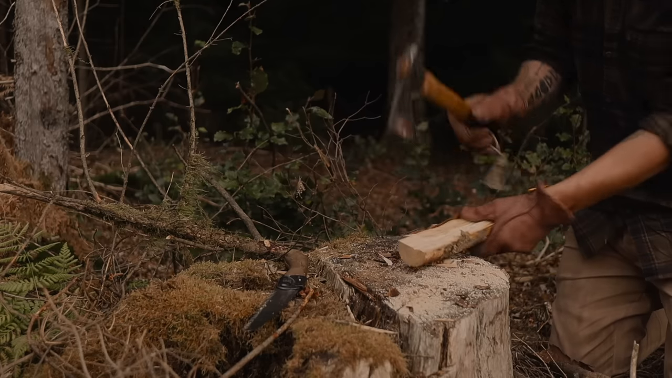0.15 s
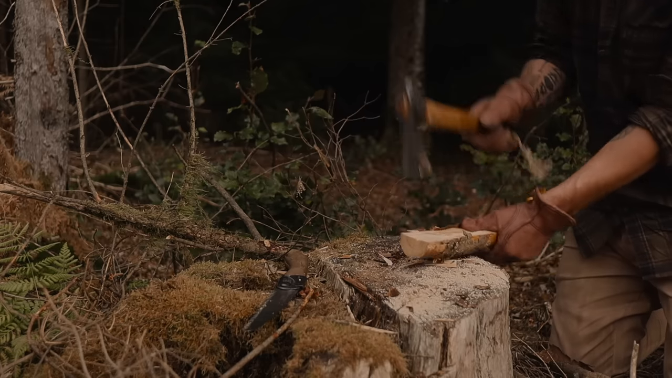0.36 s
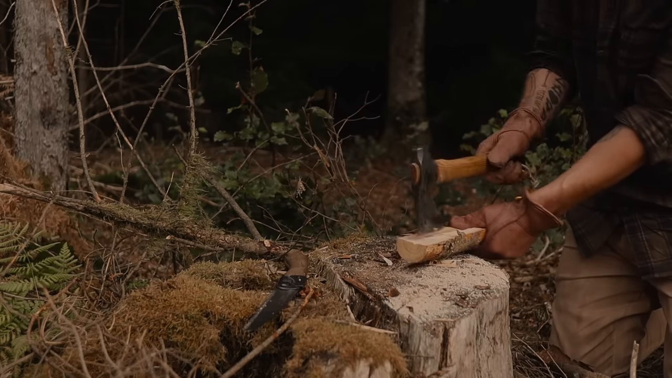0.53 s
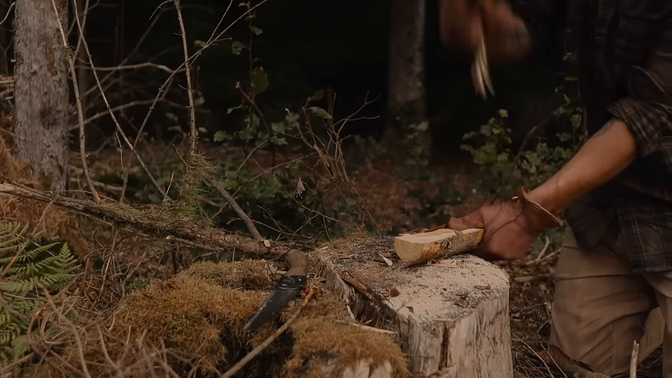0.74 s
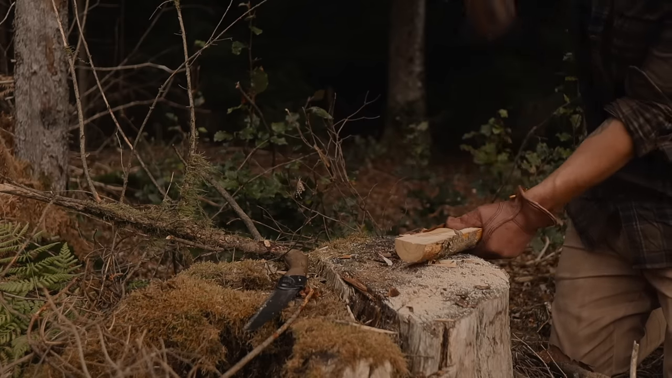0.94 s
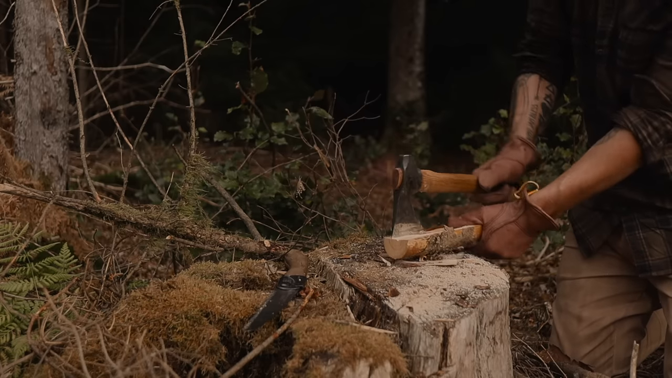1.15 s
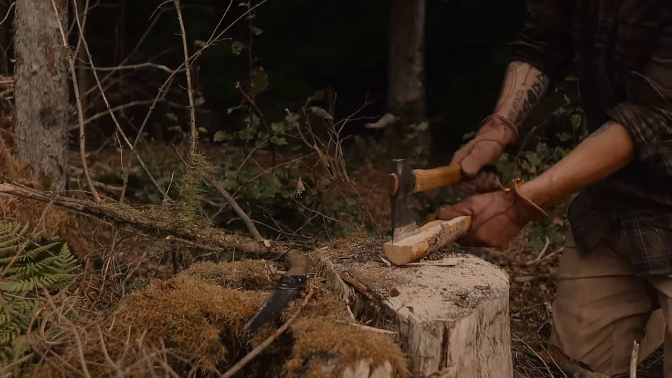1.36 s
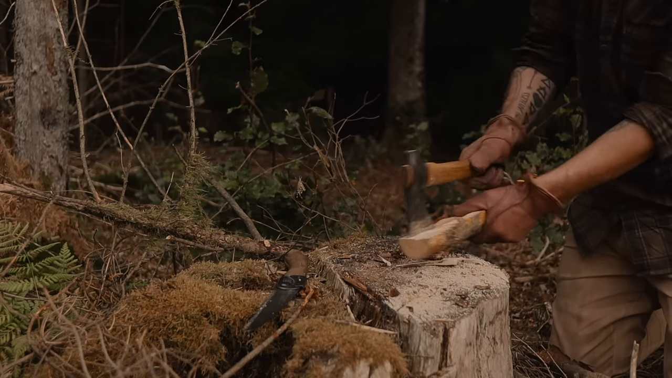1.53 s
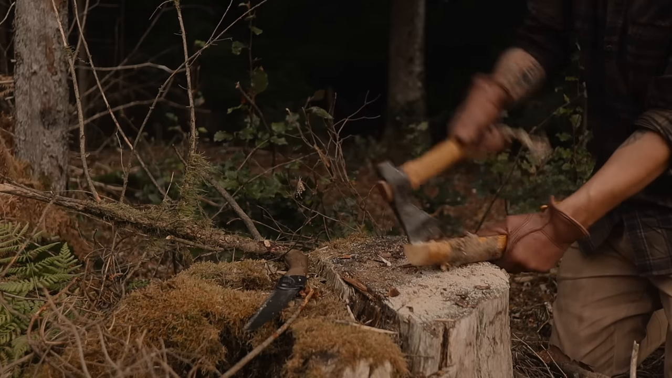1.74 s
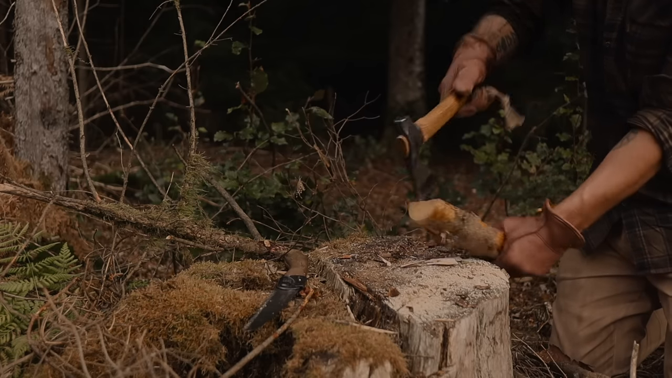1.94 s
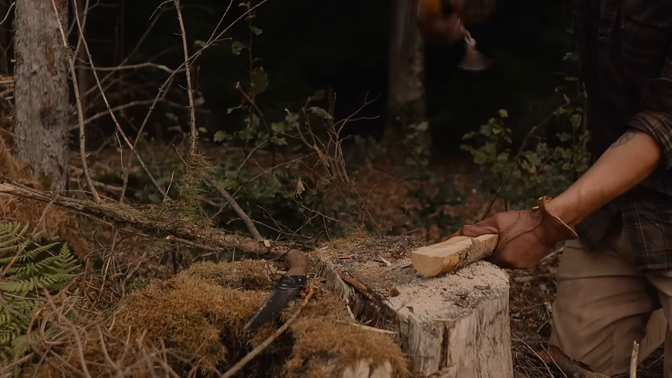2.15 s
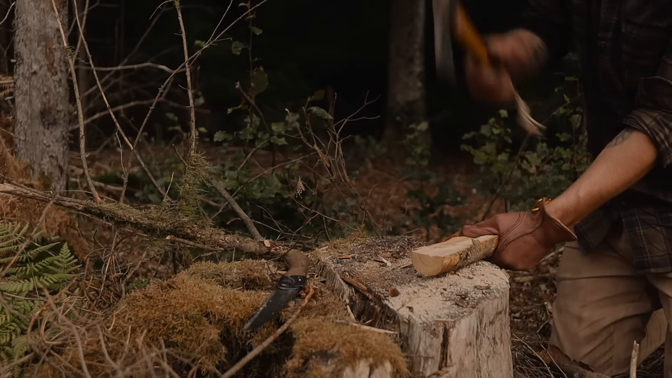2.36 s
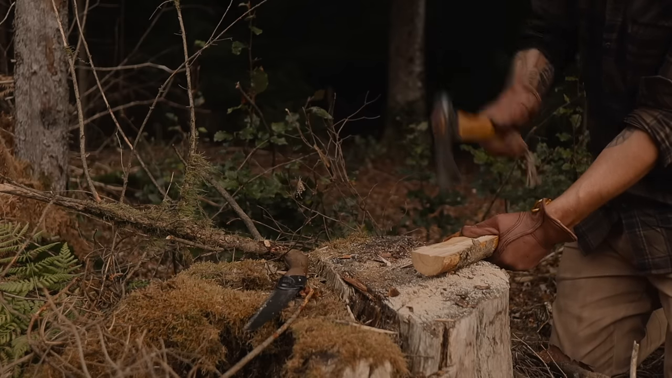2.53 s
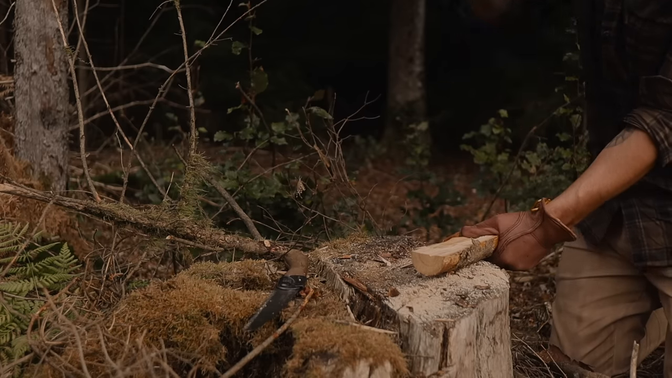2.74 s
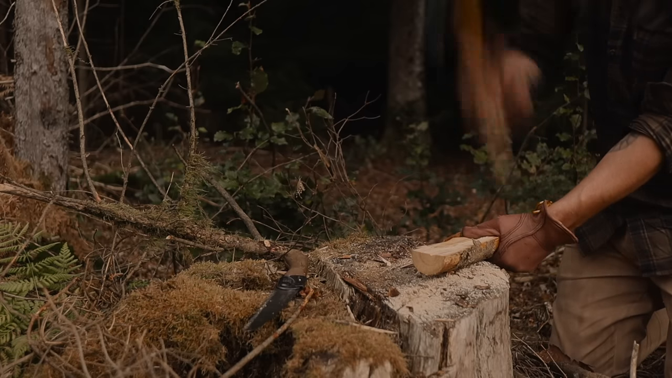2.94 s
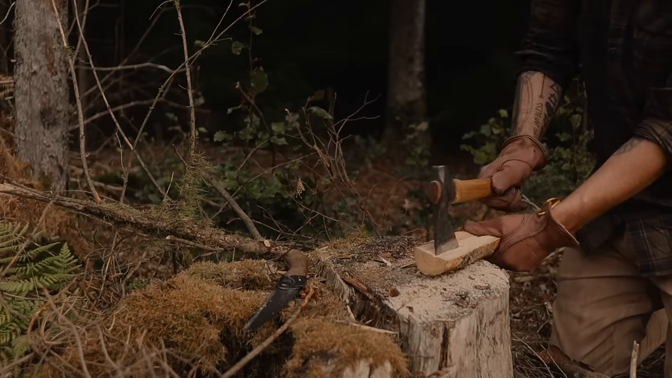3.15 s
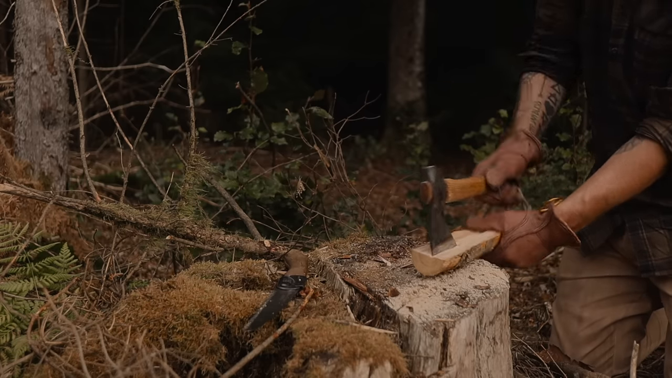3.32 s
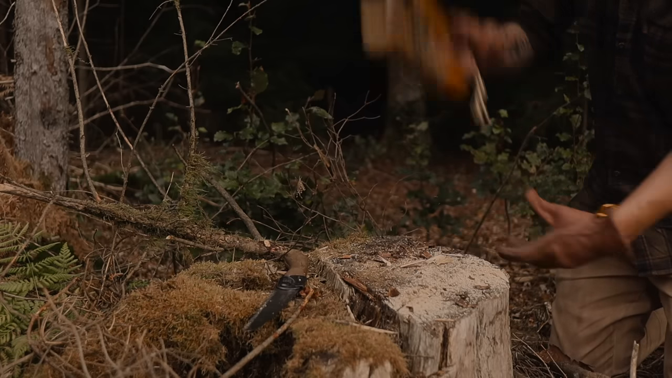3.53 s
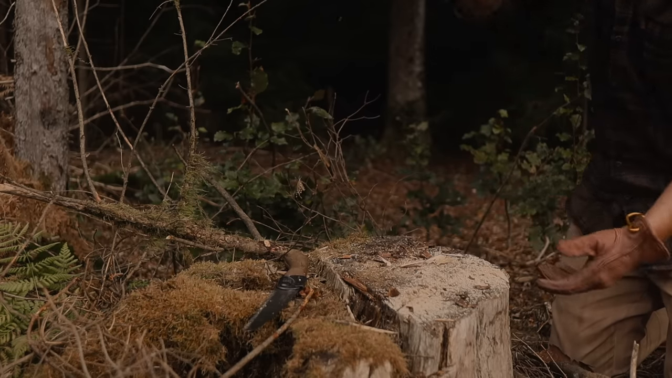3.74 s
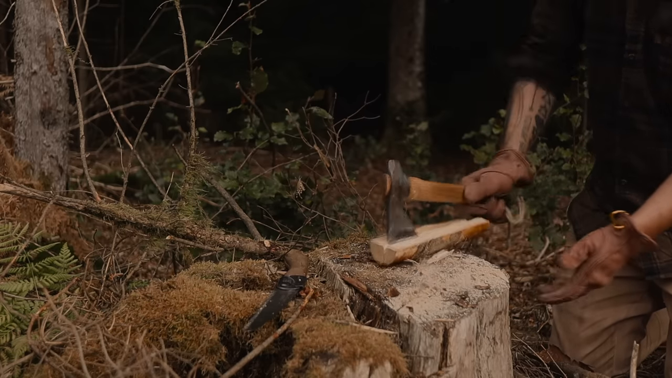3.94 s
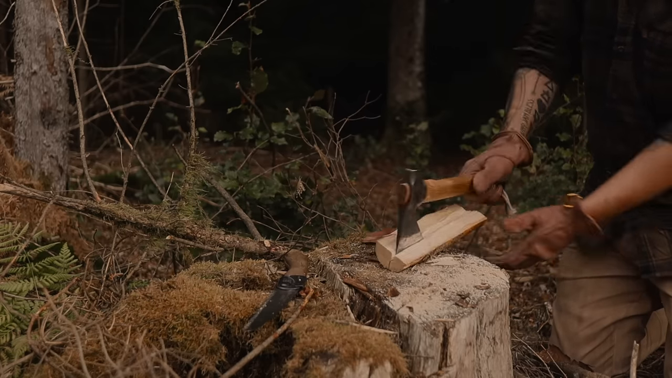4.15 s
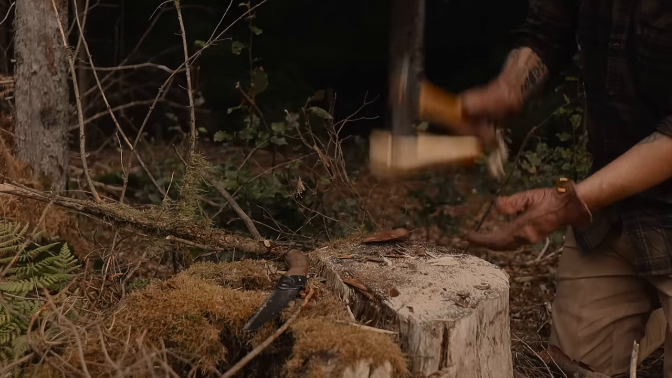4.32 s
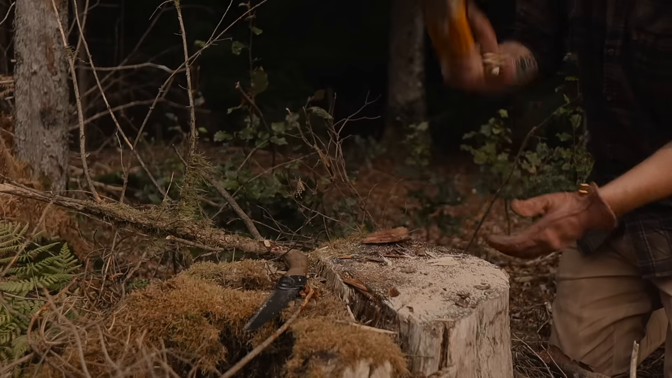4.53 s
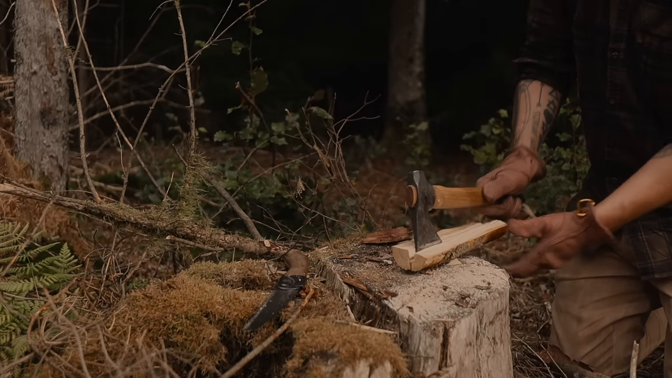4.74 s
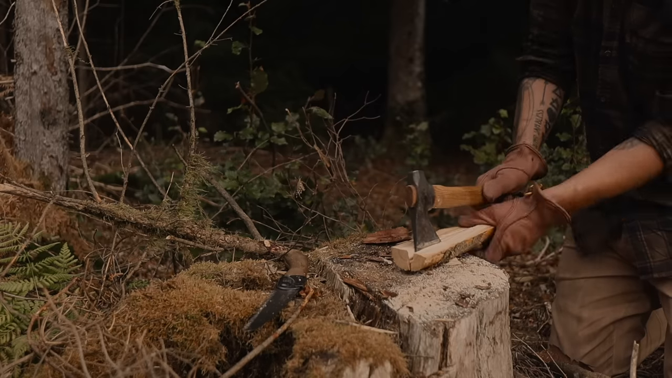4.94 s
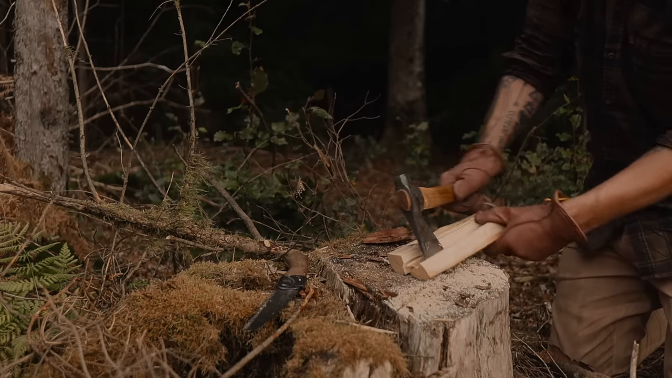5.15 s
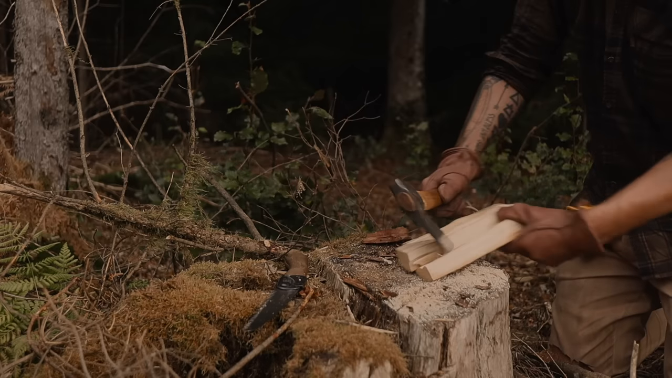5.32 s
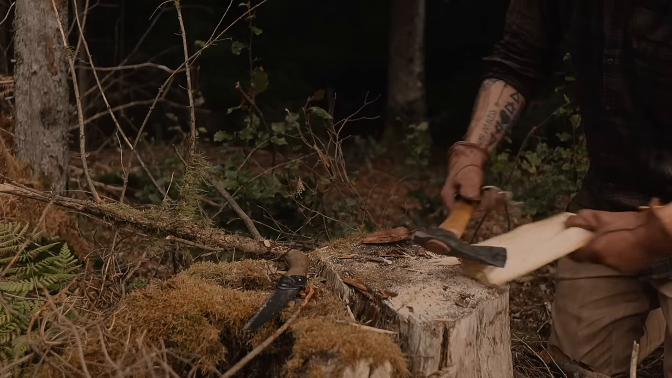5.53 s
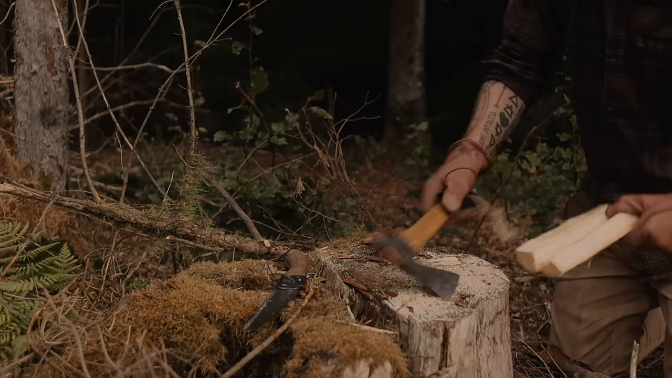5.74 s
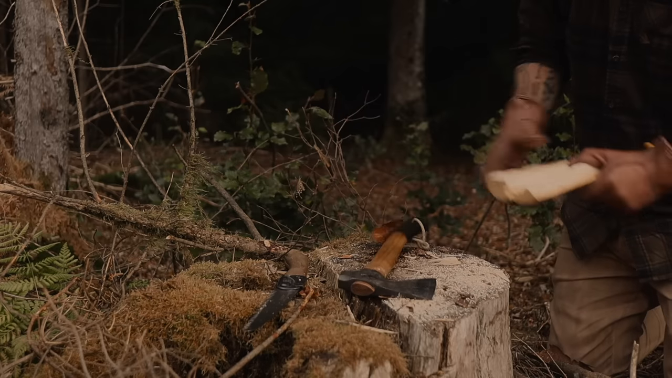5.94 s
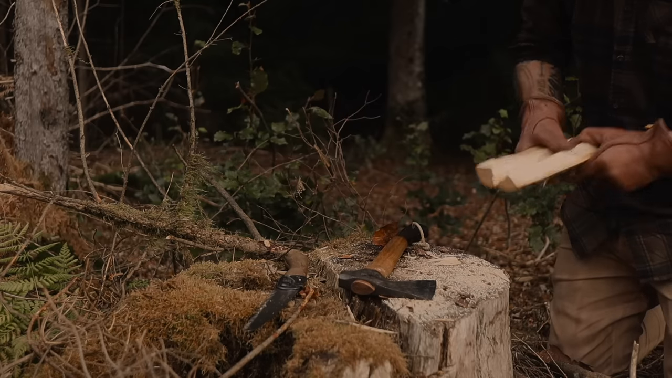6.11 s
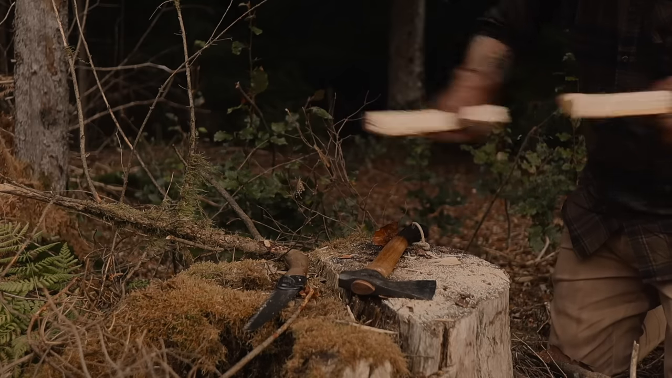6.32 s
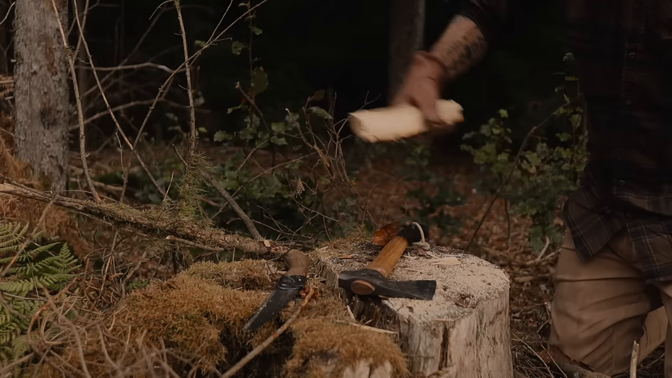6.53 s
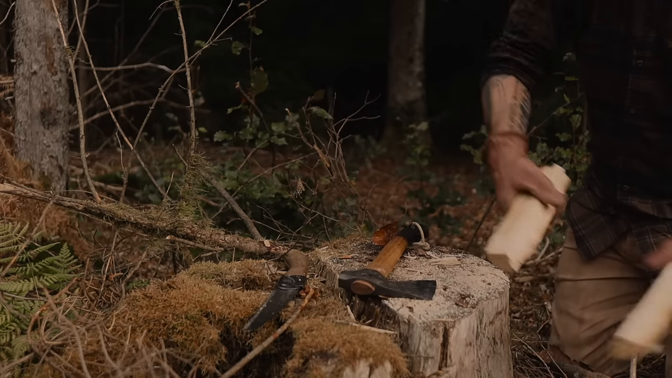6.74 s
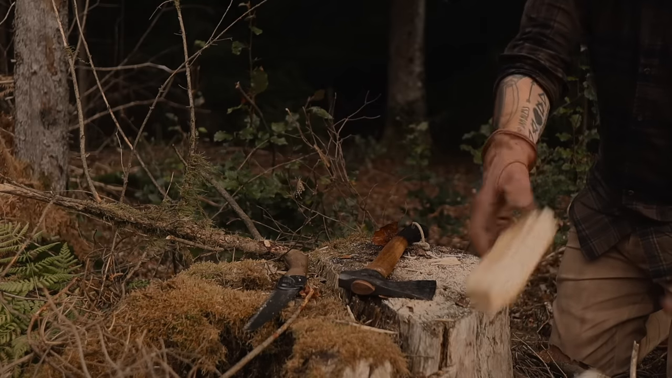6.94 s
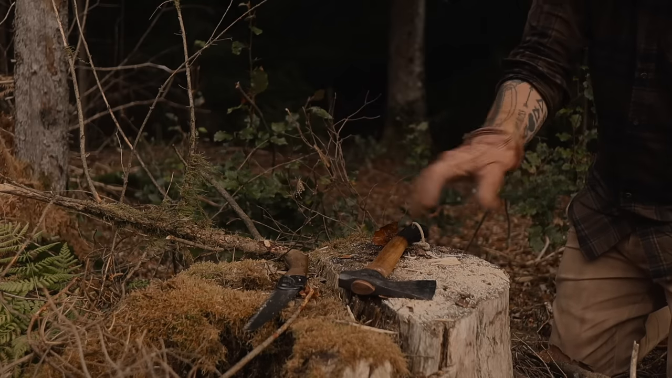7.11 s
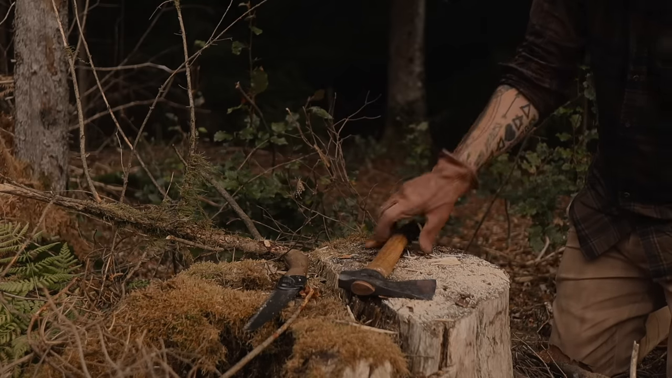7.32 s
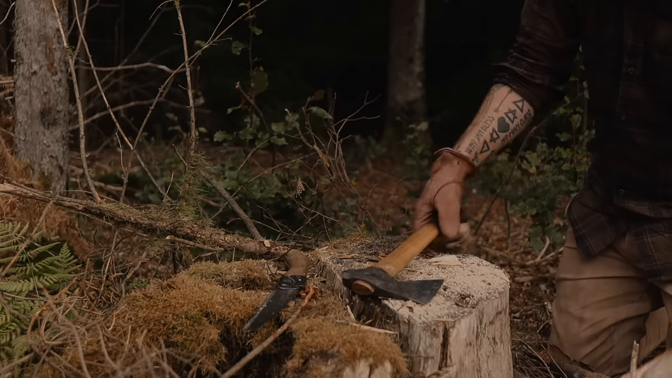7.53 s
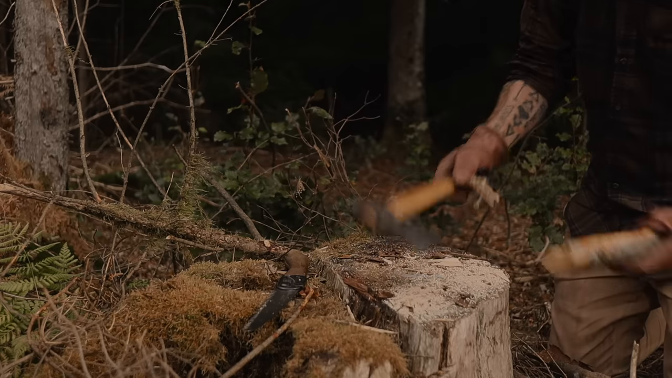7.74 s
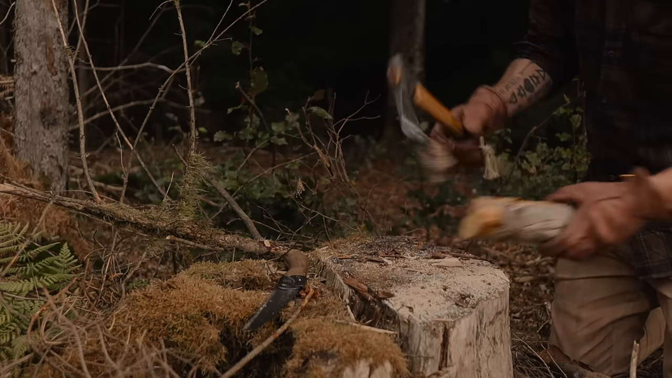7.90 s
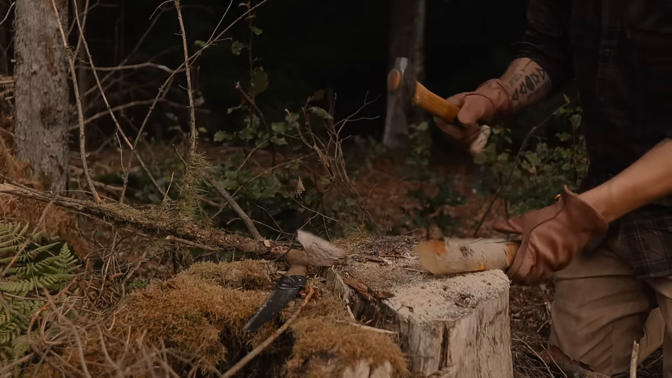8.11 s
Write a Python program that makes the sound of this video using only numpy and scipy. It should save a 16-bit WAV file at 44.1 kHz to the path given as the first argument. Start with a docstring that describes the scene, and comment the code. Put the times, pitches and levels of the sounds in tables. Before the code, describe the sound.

In quiet woodland, a hatchet cracks hard into wood four times at uneven gaps; the billet is prised apart and its pieces dropped on a pile.

```python
"""Squeaks of the blade and small rustles, then four chops into a billet on a stump; each overloads and clips.
A swelling crackle of torn fibres prises the billet; the hatchet is laid down with a clink of steel modes.
Bursts of grit and ringing modes snap the halves apart; dull notes, clacks and grit land on the woodpile.
Throughout, trees return the blows as decaying noise, over a faint hush and a thin, wavering tone."""
import sys
import numpy as np
from scipy import signal
from scipy.fft import rfft, irfft
from scipy.io import wavfile
from scipy.ndimage import uniform_filter1d

SR = 44100
rng = np.random.default_rng(int(sys.argv[2]) if len(sys.argv) > 2 else 0)


def inscribe(sig):
    """Save sig as 16-bit PCM at rate SR to the path in sys.argv[1].

    A 1-D sig is mono; a 2-D sig holds one channel per row.
    Samples are clipped to [-1, 1] before scaling.
    """
    pcm = np.round(np.clip(np.atleast_2d(sig).T, -1, 1) * 32767)
    wavfile.write(sys.argv[1], SR, pcm.astype(np.int16))


N = 360297
TIME = np.arange(N) / SR
T = TIME[:SR // 3]

# Chops: start_s, bite_db, bite_length_s, bite_tilt_db_per_octave, thud_db, knock_db, clap_db, clap_hz,
# billet_hz, billet_db, echo_db, linger_hz, linger_db
CHOPS = [(1.1456, -6, 0.0028, -1.07, -14, -4, -10.5, 805, 1952, -18, -3.5, 1250, -50),
         (3.0507, -6.5, 0.004, -0.5, -13.5, -5, -8.5, 788.6, 2383, -9, -1.5, 2327, -44),
         (3.982, -4, .0034, 0.28, -19, -11, -11.5, 825, 2200, -9.5, 2.5, 1226, -43),
         (4.7083, -5.5, 0.0042, 2.05, -18.5, -20.5, -18.5, 727, 1804, -7, -2, 1854, -47)]
# Tearing of the bite: freq_hz, gain_db
BITE_COLOUR = [(60, -12), (300, 0.5), (2200, 0), (4000, -3), (6500, -7), (8600, -5.5), (11500, -20)]
# Billet with the blade in it: pitch_multiple, level_db, t60_s
BILLET_MODES = [(.41, -12, 0.023), (1, 0.5, 0.022), (1.55, -9.5, 0.017), (1.91, -5, 0.02),
                (2.6, -10.5, .015)]
# Billet face meeting the stump: clap_pitch_multiple, level_db, t60_s
CLAP_MODES = [(.72, -4, 0.031), (1, 0.5, 0.025), (1.47, -5.5, .02)]
# Knock of billet against stump: freq_hz, level_db, t60_s
BLOCK_MODES = [(263, 1, .03), (334, 0.5, 0.022)]
# Whole stump on the soil: freq_hz, level_db, t60_s
STUMP_MODES = [(85, -19, 0.07), (130, 1.5, 0.03), (184, -17, 0.044)]
# Shudder of the ground: freq_hz, gain_db
SOIL_COLOUR = [(35, -25), (110, 0), (380, -26)]
# Last splinters breaking between the halves: start_s, grit_db, ring_db
BREAKS = [(6.215, -48.5, -46), (6.239, -32.5, -37.5), (6.2775, -12.5, -21.5), (6.292, -20.5, -33.5),
          (6.3094, -20.5, -34.5)]
# Freed halves: freq_hz, level_db, t60_s
HALF_MODES = [(1827, -4, .04), (2850, -10.5, .06), (4000, 5, 0.02)]
# Halves landing and bouncing on the pile: start_s, level_db, hardness_db, clack_hz
LANDINGS = [(7.055, -36.5, 6.5, 2200), (7.084, -33, 4, 2200), (7.094, -37.5, 3, 2230),
            (7.1801, -26.5, 8.5, 1760), (7.1993, -20.5, -7, 1810), (7.227, -39.5, 11, 3830),
            (7.341, -38, 2.5, 1630), (7.377, -46.5, -4, 1660)]
# Steel head touching down: start_s, level_db, favoured_hz
CLINKS = [(5.812, -29, 1164), (5.863, -24, 450), (5.957, -43, 1300), (5.98, -44, 4300)]
# Steel head: freq_hz, level_db, t60_s
STEEL_MODES = [(621, 1.5, 0.26), (640, -9.5, 0.12), (895, -4.5, 0.06), (1560, -4.5, 0.14), (4150, 2, 0.084)]
# Wood and handle against the stump, with one low thud under the landing at 7.2 s:
# start_s, level_db, hardness_db, body_hz, clack_hz
KNOCKS = [(1.7063, -45, -6, 315, 1350), (1.7188, -41.5, -2, 115, 2590), (1.772, -49, -4.5, 136, 2160),
          (1.995, -51, 5, 970, 1537), (2.028, -51.5, -14, 312, 1108), (2.073, -49.5, -7, 125, 3290),
          (5.619, -49.5, -1.5, 242, 2410), (5.656, -50, 3, 219, 1750), (5.88, -47, 2.5, 160, 1290),
          (5.956, -41.5, 7.5, 517, 1566), (7.2005, -33, -7, 290, 950), (6.049, -48, -5, 369, 1000),
          (8.0635, -41, -12.5, 530, 2025), (8.165, -43.5, 3.5, 778, 2120)]
# Body note of a contact: body_pitch_multiple, level_db, t60_cycles (of the body pitch)
BODY_MODES = [(0.599, -6.5, 7), (0.998, 1.5, 12), (1.45, -7.5, 8)]
# Clack of a loose stick: clack_pitch_multiple, level_db, t60_s
STICK_MODES = [(.62, -7, 0.036), (1, 1.5, 0.022), (1.12, -7.5, .018), (1.55, -7.5, 0.012)]
# Crushed grit of a contact: freq_hz, gain_db
GRIT_COLOUR = [(100, -27), (900, -11.5), (4000, 1), (6500, -2), (8600, 3), (11500, -8)]
# Single fibres and twigs breaking: start_s, level_db, centre_hz
SNAPS = [(0.223, -47.5, 3870), (0.513, -50.5, 3160), (0.744, -47, 3960), (1.1593, -26, 3010),
         (1.588, -44.5, 6030), (4.987, -49, 8020), (5.1333, -43, 8500), (5.1535, -44, 5750),
         (5.21, -30.5, 6500), (5.173, -30.5, 7340), (5.179, -35, 6600), (5.194, -28.5, 2340),
         (5.205, -29.5, 6550), (5.2294, -32, 6060), (5.2484, -38, 5000), (5.942, -44.5, 3300),
         (6.531, -52.5, 4517), (7.613, -47.5, 4040), (8.0574, -43, 6700)]
# Splinters giving way, debris settling: start_s, length_s, highest_level_db
SPLINTERS = [(5.26, 0.32, -46), (7.37, 0.32, -49)]
# Blade squeaking in the wood: start_s, length_s, level_db
SQUEAKS = [(0.175, .018, -41.5), (0.189, .019, -41.5)]
# Hands, sleeves and bark moving: start_s, length_s, level_db, roughness (no unit)
RUSTLES = [(0.139, 0.45, -63, 0.35), (1.781, 0.2, -61.5, 1.1), (3.419, 0.11, -58.5, 0.5),
           (4.851, 0.31, -56.5, 0.7), (5.229, 0.45, -53.5, 0.92), (6.078, 0.29, -55.5, 0.8),
           (7.15, 0.29, -47, 0.6), (7.33, 0.39, -53.5, 0.42), (7.957, 0.25, -61, 0.16)]
# Bright part of a rustle: freq_hz, gain_db
CRACKLE_COLOUR = [(1200, -11.5), (4200, 2.5), (6000, -4), (8500, 3.5), (11500, -10.5)]
# Dull part of a rustle: freq_hz, gain_db
RUB_COLOUR = [(80, -6), (1900, -3.5), (3500, -9.5), (8000, -39)]
# Slides of wood over wood, bark or glove, and of the blade in the split: start_s, length_s, level_db, centre_hz
SCRAPES = [(1.726, 0.053, -44, 6010), (5.303, 0.092, -50.5, 592), (5.403, 0.018, -44.5, 4290),
           (5.31, 0.11, -54, 4240), (7.047, 0.075, -40.5, 7320), (7.885, 0.045, -48, 6020)]
# Near trees, echo colour: freq_hz, gain_db
TREES_COLOUR = [(80, 5.5), (450, -4), (4000, -2.5), (8500, 1)]
# Near trees, echo decay: freq_hz, t60_s
TREES_T60 = [(80, 0.47), (400, 0.23), (1500, 0.5), (8500, 0.45), (11500, 0.29)]
# Far wood, echo colour: freq_hz, gain_db
FAR_WOOD_COLOUR = [(100, -9), (700, -1), (2000, -2), (9000, -15)]
# Hush of the wood: freq_hz, gain_db
AIR_COLOUR = [(25, -17.5), (58, 3), (160, -4.5), (500, -5), (1200, -8), (1750, -7.5), (4500, -15.5),
              (8600, -16), (11500, -22)]

STUMP_LAG_S = 0.0025  # the blow reaches the stump through the billet
SOIL_DB, SOIL_T60_S = -11.5, 0.19  # level relative to the thud
GIVE_S, TEAR_DB, TEAR_HZ = 5.207, -32, 7560  # the billet gives
SWELL_DB_PER_S, EASE_DB_PER_S = 169.5, 600
HALF_BODY_HZ, HALF_BODY_DB, HALF_CLACK_HZ, HALF_CLACK_DB = 760, -26.5, 2015, -18  # dB relative to the grit
CLACK_PER_BODY = 3.04  # clack pitch over body pitch of a loose stick
HEAD_HZ, HEAD_HARD_DB, HEAD_CLACK_HZ, HEAD_KNOCK_DB = 216.5, -6.5, 1400, -12  # knock relative to the clink
CLACK_DB, GRIT_DB = 4, -3.5  # relative to a contact's level; hardness adds to grit, takes from body
ROCK_DB, ROCK_DB_PER_OCTAVE = -8, -3.5  # the stump rocks less under a light, high-pitched piece
SPLINTER_COUNT, SPLINTER_SPREAD_DB = 13, 7
SPLINTER_LOW_HZ, SPLINTER_HIGH_HZ = 1490, 8050
SQUEAK_HZ = 3443
SLIP_FROM_HZ, SLIP_TO_HZ, SLIP_JITTER, SLIP_NOISE = 660, 960, 0.04, 0.3
RUSTLE_TAPER = 0.85  # share of a movement spent speeding up and slowing down
LINGER_T60_S, LINGER_WIDTH_HZ = 0.85, 280
STUMP_ECHO_DB, PILE_ECHO_DB = -1.5, 6.5  # the pile is farther off, so more of it is echo
AIR_DB = -60
TONE_HZ, TONE_WIDTH_HZ, TONE_DB = 1730, 60, -75
BAND_HZ, EDGE_HZ = 11950, 16000


def chop(bite_db, length_s, spectrum, thud_db, knock_db, clap_db, clap_hz, billet_hz, billet_db):
    """The edge tears into the grain, the billet rings and slams the stump, and the stump rocks in the soil."""
    u = T / length_s
    tearing = u * np.exp(-u ** 2) + 0.08 * (1 - np.exp(-u)) * np.exp(-T / 0.0098)
    out = amp(bite_db) * burst(colour(fracture(tearing), spectrum))
    out += amp(billet_db) * ring(BILLET_MODES, billet_hz, rise_s=0.001)
    out += amp(knock_db) * ring(BLOCK_MODES, rise_s=0.002)
    out += amp(clap_db) * ring(CLAP_MODES, clap_hz, rise_s=0.002)
    add(out, STUMP_LAG_S, amp(thud_db) * ring(STUMP_MODES, rise_s=0.015))
    shudder = colour(rng.standard_normal(len(T)), SOIL_COLOUR) * amp(-60 * T / SOIL_T60_S)
    return out + amp(thud_db + SOIL_DB) * burst(shudder)


def prising():
    """The tearing of fibres swells as the blade is twisted, until the billet gives, then dies quickly."""
    strain_db = np.minimum(SWELL_DB_PER_S * (TIME - GIVE_S), EASE_DB_PER_S * (GIVE_S - TIME))
    tear_colour = hump(TEAR_HZ, below_db=-3.5, above_db=-3.5, peak_db=7)
    fibres = colour(grains(N, per_s=5000, spread_db=2.5), tear_colour)
    return amp(TEAR_DB + strain_db) * evened(fibres)


def breaks():
    """Thick splinters part in a spray of grit and set the two halves ringing."""
    out = np.zeros(N)
    for start_s, grit_db, ring_db in BREAKS:
        spray = contact(HALF_BODY_HZ, HALF_BODY_DB, HALF_CLACK_HZ, HALF_CLACK_DB, 0, rattle=0.82, tail_s=0.011)
        add(out, start_s, amp(grit_db) * spray)
        add(out, start_s, amp(ring_db) * ring(HALF_MODES))
    return out


def woodpile(lowest_hz=160):
    """Loose sticks clatter on the pile, with their lowest bass filtered away."""
    out = np.zeros(N)
    for start_s, level_db, hard_db, clack_hz in LANDINGS:
        add(out, start_s, knock(level_db, hard_db, clack_hz / CLACK_PER_BODY, clack_hz, rattle=0.64))
    return signal.sosfilt(signal.butter(2, lowest_hz, "highpass", fs=SR, output="sos"), out)


def clinks():
    """The hatchet knocks on the stump and rings; each contact favours the modes near its own pitch."""
    out = np.zeros(N)
    for start_s, level_db, favoured_hz in CLINKS:
        modes = []
        for hz, mode_db, t60_s in STEEL_MODES:
            octaves = np.log2(hz / favoured_hz)
            modes.append((hz, mode_db - 11 * octaves ** 2 / (1 + 0.45 * abs(octaves)), t60_s))
        steel = amp(level_db) * ring(modes, rise_s=0.00039)
        add(out, start_s, steel + on_stump(level_db + HEAD_KNOCK_DB, HEAD_HARD_DB, HEAD_HZ, HEAD_CLACK_HZ))
    return out


def knocks():
    """Wood and handle knock against the stump, with one low thud under the landing at 7.2 s."""
    out = np.zeros(N)
    for start_s, *blow in KNOCKS:
        add(out, start_s, on_stump(*blow))
    return out


def on_stump(level_db, hard_db, body_hz, clack_hz):
    """A knock joined by the low rocking modes of the stump."""
    rock_db = ROCK_DB + ROCK_DB_PER_OCTAVE * np.log2(body_hz / STUMP_MODES[1][0])
    rocking = amp(level_db - hard_db + rock_db) * ring(STUMP_MODES, rise_s=0.013)
    return knock(level_db, hard_db, body_hz, clack_hz, rattle=2.06) + rocking


def knock(level_db, hard_db, body_hz, clack_hz, rattle):
    """A contact whose hardness raises the grit and lowers the body note."""
    body_db, clack_db, grit_db = level_db - hard_db, level_db + CLACK_DB, level_db + hard_db + GRIT_DB
    return contact(body_hz, body_db, clack_hz, clack_db, grit_db, rattle, tail_s=0.028)


def contact(body_hz, body_db, clack_hz, clack_db, grit_db, rattle, tail_s):
    """A dull body note, a hard clack and a spit of grit; low body notes last longest."""
    crush = fracture((1 - np.exp(-T / 0.00067)) * (np.exp(-T / 0.0022) + 0.08 * np.exp(-T / tail_s)))
    body_modes = [(multiple * body_hz, db, cycles / body_hz) for multiple, db, cycles in BODY_MODES]
    note = ring(body_modes, rise_s=0.38 / body_hz)
    body_colour = hump(body_hz, below_db=-7.5, above_db=-13.0, peak_db=-11.5)
    dull_crush = burst(colour(crush * np.exp(-T / 0.0099), body_colour))
    body = burst(note + 0.5 * dull_crush)
    buzz = burst(colour(crush, hump(clack_hz, below_db=-1, above_db=-5.5)))
    clack = burst(ring(STICK_MODES, clack_hz, rise_s=0.00057) + rattle * buzz)
    grit = burst(colour(crush, GRIT_COLOUR))
    return amp(body_db) * body + amp(clack_db) * clack + amp(grit_db) * grit


def snaps():
    """Single fibres and twigs break; splinters and debris tick at random, tending to fade."""
    out = np.zeros(N)
    for start_s, level_db, hz in SNAPS:
        add(out, start_s, snap(level_db, hz))
    for start_s, length_s, highest_db in SPLINTERS:
        for late, size, thin in rng.random((SPLINTER_COUNT, 3)):
            hz = SPLINTER_LOW_HZ * (SPLINTER_HIGH_HZ / SPLINTER_LOW_HZ) ** thin
            add(out, start_s + late * length_s, snap(highest_db - SPLINTER_SPREAD_DB * (size + late), hz))
    return out


def snap(level_db, hz):
    """A fibre lets go in about a millisecond, with a weaker tail."""
    crack = fracture(np.exp(-T / 0.00081) + 0.18 * np.exp(-T / 0.0046))
    return amp(level_db) * burst(colour(crack, hump(hz, below_db=-6.0, above_db=-5.0, peak_db=3.0)))


def squeak():
    """Steel sticks and slips in the wood hundreds of times a second, quickening through each stroke."""
    out = np.zeros(N)
    for start_s, length_s, level_db in SQUEAKS:
        count = round(length_s * SR)
        waver = evened(uniform_filter1d(rng.standard_normal(len(T)), size=60))[:count]
        slip_hz = np.linspace(SLIP_FROM_HZ, SLIP_TO_HZ, count) * (1 + SLIP_JITTER * waver)
        turns = np.cumsum(slip_hz) / SR
        slips = evened(np.diff(np.floor(turns), prepend=0))  # one impulse a turn
        slips = slips + SLIP_NOISE * rng.standard_normal(len(T))[:count]
        sound = colour(slips, hump(SQUEAK_HZ, below_db=-6.5, above_db=-3.5, peak_db=10))
        add(out, start_s, amp(level_db) * evened(sound * signal.windows.tukey(count, 0.5)))
    return out


def scrapes():
    """Wood or steel sticks and slips through a short slide."""
    out = np.zeros(N)
    for start_s, length_s, level_db, hz in SCRAPES:
        count = round(length_s * SR)
        slide = colour(grains(count, per_s=2300, spread_db=1.5), hump(hz, below_db=-0.5, above_db=-3.0))
        add(out, start_s, amp(level_db) * evened(slide * signal.windows.tukey(count, 0.5)))
    return out


def rustles():
    """Splinters, bark and cloth crackle over a duller rub; each movement swells and fades."""
    out = np.zeros(N)
    for start_s, length_s, level_db, rough in RUSTLES:
        count = round(length_s * SR)
        bright = grains(count, per_s=2500, spread_db=1.33 * rough, clump_db=4.5 * rough)
        dull = grains(count, per_s=560, spread_db=6.5 * rough, clump_db=2.36 * rough)
        crackle = evened(colour(bright, CRACKLE_COLOUR))
        rub = evened(colour(dull, RUB_COLOUR))
        movement = (amp(1.7) * crackle + amp(-0.5) * rub) * signal.windows.tukey(count, RUSTLE_TAPER)
        add(out, start_s, amp(level_db) * movement)
    return out


def lingering(hz):
    """A narrow band of noise at the chop's own linger_hz hangs on among the distant trees."""
    t = TIME[:SR]
    return amp(-60 * t / LINGER_T60_S) * band_noise(hz, LINGER_WIDTH_HZ, SR) * (1 - np.exp(-t / 0.03))


def forest(x):
    """Nearby trunks scatter a bright echo; the far wood answers with a faint, long middle register."""
    t = TIME[:2 * SR]
    hz, at_s, z = signal.stft(rng.standard_normal(len(t)), SR, nperseg=256)
    decay = amp(-60 * at_s / read(TREES_T60, hz)[:, None])
    near = signal.istft(z * decay, SR, nperseg=256)[1][:len(t)]
    near *= np.interp(t, [0.003, 0.012, 0.028, 0.036], [0.056, 0.9, 0.45, 0.94])  # most trunks stand metres off
    near *= amp(1.8 * evened(uniform_filter1d(rng.standard_normal(len(t)), size=350)))  # and stand unevenly
    far = rng.standard_normal(len(t)) * amp(-60 * t / 0.86) * (1 - np.exp(-t / 0.06))
    near_echo = amp(-27) * colour(near / np.linalg.norm(near), TREES_COLOUR)
    far_echo = amp(-39.5) * colour(far / np.linalg.norm(far), FAR_WOOD_COLOUR)
    return signal.fftconvolve(x, near_echo + far_echo)[:N]


def air():
    """The faint hush of the wood, drifting slowly, with a thin far-off tone of wavering level."""
    knots_s = np.arange(0, N / SR + 1, 0.2)
    drift, waver = (np.interp(TIME, knots_s, row) for row in rng.standard_normal((2, len(knots_s))))
    hush = amp(AIR_DB + 0.5 * drift) * evened(colour(rng.standard_normal(N), AIR_COLOUR))
    return hush + amp(TONE_DB + 2 * waver) * band_noise(TONE_HZ, TONE_WIDTH_HZ, N)


def fracture(envelope, average_bins=280):
    """Countless fibres failing under an envelope: noise with an even spread of pitches."""
    z = rfft(envelope * rng.standard_normal(len(envelope)))
    local_power = uniform_filter1d(abs(z) ** 2, average_bins)
    even_noise = irfft(z / np.sqrt(local_power + 1e-12), len(envelope))
    return even_noise * (envelope > envelope.max() * 1e-5)


def ring(modes, pitch=1, rise_s=0.0005):
    """Dying modes set going by a contact that builds over rise_s; the air follows their rate of change."""
    waves = np.zeros(len(T))
    for hz, level_db, t60_s in modes:
        waves += amp(level_db - 60 * T / t60_s) / hz * np.sin(2 * np.pi * hz * pitch * T)
    return burst(np.diff(waves * (1 - np.exp(-(T / rise_s) ** 2)), prepend=0))


def grains(count, per_s, spread_db, clump_db=3.5):
    """Tiny fibre ticks of uneven size and pitch, their level clumping as the wood sticks and slips."""
    out, t = np.zeros(count), T[:256]
    for hz in np.geomspace(400, 10000, num=12):
        sizes = amp(spread_db * np.minimum(rng.exponential(1, count), 3.5))
        sizes *= rng.random(count) < per_s / 12 / SR
        tick = hz * np.exp(-t * hz / 0.57) * np.sin(2 * np.pi * hz * t)
        out += signal.oaconvolve(sizes * rng.choice([-1, 1], count), tick)[:count]
    clumps = evened(uniform_filter1d(rng.standard_normal(count), size=300))
    return (evened(out) + 0.45 * rng.standard_normal(count)) * amp(clump_db * clumps)


def hump(hz, below_db=-6, above_db=-9, peak_db=5):
    """The spectrum of a sliver of wood: a bump at hz, slopes in dB an octave either side, and a soft top."""
    f = np.geomspace(40, 14000, num=90)
    octaves = np.log2(f / hz)
    slopes_db = np.where(octaves < 0, -below_db * octaves, above_db * octaves)
    bump_db = peak_db * np.exp(-(octaves / 0.19) ** 2)
    return np.transpose([f, slopes_db + bump_db - 8 * (f / 11500) ** 6])


def band_noise(hz, width_hz, count):
    """A narrow band of noise at rms 1."""
    return evened(signal.lfilter(*signal.iirpeak(hz, hz / width_hz, fs=SR), rng.standard_normal(count)))


def colour(x, points):
    """Causal minimum-phase filter with the given spectrum."""
    log_gain = np.log(amp(read(points, abs(np.fft.fftfreq(4096, 1 / SR)))))
    taps = np.fft.ifft(np.exp(np.conj(signal.hilbert(log_gain)))).real
    return signal.fftconvolve(x, taps[:len(taps) // 2])[:len(x)]


def read(points, hz):
    """Reads a table on a log-frequency axis."""
    f, value = np.transpose(points)
    return np.interp(np.log(hz + 1), np.log(f), value)


def amp(db):
    """Decibels to gain."""
    return 10 ** (np.asarray(db) / 20)


def evened(x):
    """Scales to rms 1."""
    return x / np.sqrt(np.mean(x ** 2) + 1e-20)


def burst(x):
    """Scales a short sound to the energy of 10 ms at rms 1."""
    return x * np.sqrt(SR / 100 / (np.sum(x ** 2) + 1e-20))


def add(mix, start_s, sound):
    """Mixes a sound in at start_s."""
    part = mix[round(start_s * SR):][:len(sound)]
    part += sound[:len(part)]


def scene():
    """Chops and small work at the stump and pile, with the wood around them."""
    work = prising() + breaks() + clinks() + knocks() + snaps() + squeak() + scrapes() + rustles()
    pile = woodpile()
    direct = work + pile
    outward = amp(STUMP_ECHO_DB) * work + amp(PILE_ECHO_DB) * pile  # what the trees receive
    distant = air()
    for start_s, bite_db, length_s, tilt_db, thud_db, *body, echo_db, linger_hz, linger_db in CHOPS:
        spectrum = [(hz, db + tilt_db * np.log2(hz)) for hz, db in BITE_COLOUR]
        # heard from all sides at once, a chop has a smooth spectrum
        crack = burst(colour(signal.unit_impulse(len(T)), spectrum))
        add(direct, start_s, chop(bite_db, length_s, spectrum, thud_db, *body))
        add(outward, start_s, amp(echo_db) * crack + amp(thud_db) * ring(STUMP_MODES))
        add(distant, start_s, amp(linger_db) * lingering(linger_hz))
    return (direct + forest(outward) + distant)[None]


def low_pass(x, hz):
    """Steep band limit."""
    return signal.oaconvolve(x, signal.firwin(301, hz, window=("kaiser", 8), fs=SR)[None], "same")


def record(dry):
    """The chops overload and clip, are low-passed, then clip again at full scale before a last low-pass."""
    overloaded = low_pass(np.clip(dry, -1.05, 1.05), BAND_HZ)
    return low_pass(np.clip(overloaded, -1, 1), EDGE_HZ)


dry = scene()
out = record(dry)
inscribe(out)
```